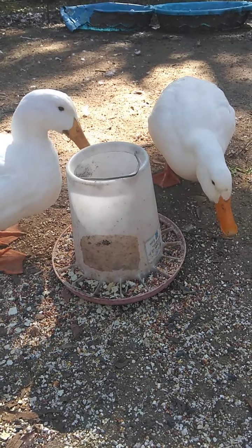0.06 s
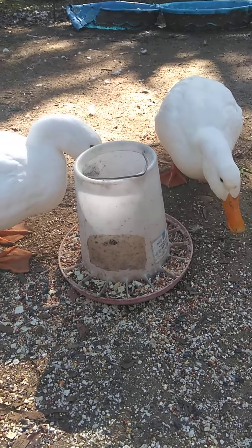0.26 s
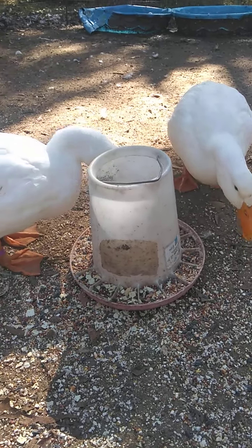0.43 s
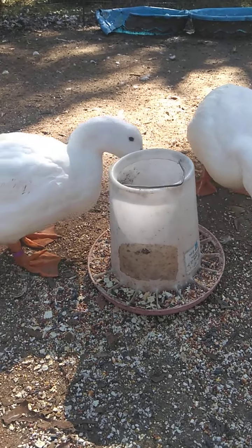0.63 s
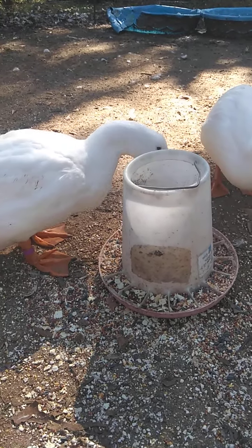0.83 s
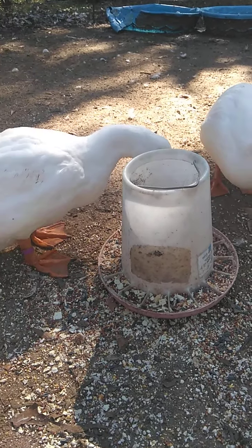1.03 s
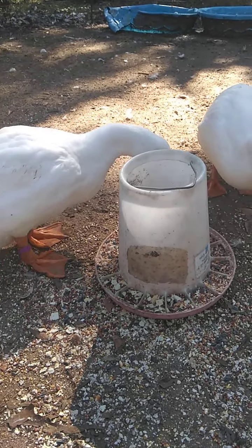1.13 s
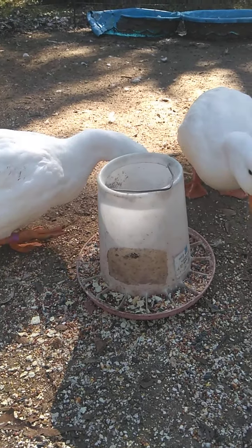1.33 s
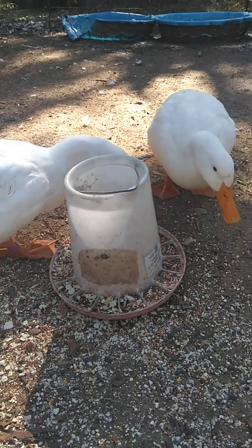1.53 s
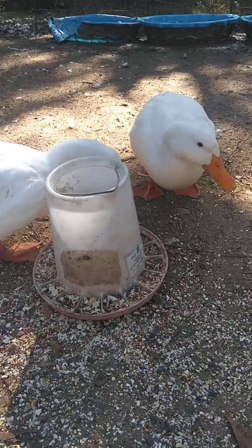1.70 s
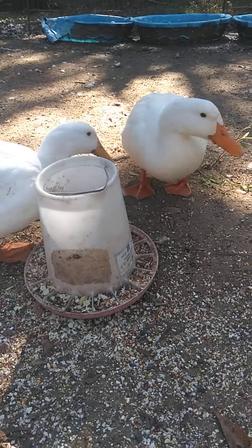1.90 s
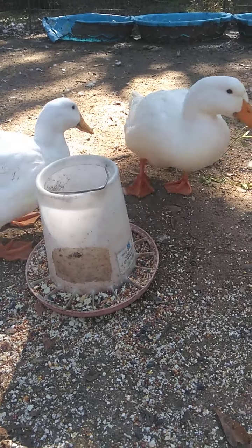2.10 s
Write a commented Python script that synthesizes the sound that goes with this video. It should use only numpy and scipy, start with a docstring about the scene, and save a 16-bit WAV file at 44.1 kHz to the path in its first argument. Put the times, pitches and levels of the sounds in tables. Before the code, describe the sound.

Duck quacking, close and dry outdoors. Three short, low, muffled clucks at about 0.1, 0.2 and 0.36 seconds lead to a loud, nasal, raspy quack at 0.5. A sharp bill tick comes at 0.83, a second quack at 0.9. Near quiet follows, then soft low pops from 1.6 and faint squeaks from 1.8 to 2.15. Very faint rumble, hiss, distant engine and insect lie beneath.

```python
"""A dirt yard with white ducks at a feeder: three low clucks run up to a loud quack, and a second quack follows.
Trains of pulses ring a resonant throat for the calls; single pulses make the soft pops and the bill ticks.
Gliding sines make thin squeaks, and filtered noise makes brief hiss. Decaying noise gives the yard's short answer.
One narrow tone rings faintly, an insect chirps, and a far engine drones over a low rumble."""
import sys
import numpy as np
from scipy import signal
from scipy.fft import rfft, irfft, next_fast_len
from scipy.io import wavfile
from scipy.ndimage import map_coordinates

SR = 44100
rng = np.random.default_rng(int(sys.argv[2]) if len(sys.argv) > 2 else 0)


def store_pcm(level_fs):
    """Save levels as 16-bit WAV."""
    pcm = np.round(np.clip(level_fs, -1, 1) * 32767).astype(np.int16)
    wavfile.write(sys.argv[1], SR, np.atleast_2d(pcm).T)


N = 94815
TIME = np.arange(N) / SR
SIZE = 2048  # samples in one ringing pulse
LEAD = 256  # samples in a pulse ahead of its tap
GRID = np.fft.rfftfreq(SIZE, 1 / SR)  # Hz
SQUEAK_ROUGH, SQUEAK_FLUTTER_HZ = 0.59, 358.3  # depth of the flutter, its random knots a second


def amp(db):
    """A level in decibels is 20 times the logarithm of the amplitude ratio."""
    return 10 ** (np.asarray(db) / 20)


def unit(x):
    """Dividing by the root mean square gives a signal unit rms."""
    return x / np.sqrt(np.mean(x ** 2) + 1e-20)


def along(points, hz):
    """Points of (Hz, value) are interpolated on a logarithmic frequency axis."""
    f, v = np.transpose(points)
    return np.interp(np.log(hz + 1), np.log(f + 1), v)


def wobble(rate):
    """Random modulation: a smooth curve through normal deviates, rate knots a second."""
    return map_coordinates(rng.standard_normal(4096), [TIME * rate], mode="wrap")


def filtered(x, response):
    """Linear filtering multiplies the spectrum by a response of frequency."""
    m = next_fast_len(N + SR // 2)
    spectrum = rfft(x, m) * response(np.fft.rfftfreq(m, 1 / SR))
    return irfft(spectrum, m)[..., :N]


def ringing(gain_db, early=0):
    """Impulse response: folding the cepstrum gives minimum phase; the share early builds up ahead of the tap."""
    cepstrum = irfft(np.log(np.maximum(amp(gain_db), 1e-6)))
    cepstrum[1:SIZE // 2] *= 2 * (1 - early)
    cepstrum[SIZE // 2 + 1:] *= 2 * early
    h = np.roll(irfft(np.exp(rfft(cepstrum))), LEAD)
    # equal energy whatever the colour: 0 dB is rms 1 over a quarter of a millisecond
    return h / np.linalg.norm(h) * np.sqrt(SR / 1000) / 2


def puff(decay_s):
    """Exponential decay: a noise burst of energy 1 falls to 1/e in decay_s."""
    burst = rng.standard_normal(SIZE // 2) * np.exp(-np.arange(SIZE // 2) / SR / decay_s)
    return burst / np.linalg.norm(burst)


def add(out, s, sound):
    """Superposition: a sound is added in place so that its tap falls at s seconds."""
    part = out[max(round(s * SR) - LEAD, 0):][:len(sound)]
    part += sound[:len(part)]


def noise(spectrum, alike):
    """Interaural correlation: mid and side noise are mixed to the correlation alike, at rms 1."""
    mid, side = filtered(rng.standard_normal((2, N)), lambda hz: amp(along(spectrum, hz)))
    side = side * np.tan(np.arccos(np.clip(alike, 0, 1)) / 2)
    return unit(np.array([mid + side, mid - side]))


def engine():
    """Harmonic source: a fundamental and weak second harmonic share one unsteady phase and level."""
    # Far engine. Each row: time in seconds, pitch in Hz, level in dB before the random swing.
    drone_curve = [(.68, 160.6, -80.5), (0.799, 169.4, -64.5), (1.099, 163.7, -64), (1.329, 152, -78),
                   (1.999, 145.5, -75)]
    s, hz, db = np.transpose(drone_curve)
    phase = 2 * np.pi * np.cumsum(np.interp(TIME, s, hz)) / SR + 0.45 * wobble(28)
    level = amp(np.interp(TIME, s, db) + 2.5 * wobble(20))
    return np.sqrt(2) * level * (np.sin(phase) + amp(-21.0) * np.sin(2 * phase))


def rumble():
    """Amplitude-modulated noise: a low band, nearly alike on both sides, swells at random."""
    # Colour of the rumble. Each row: frequency in Hz, relative level in dB.
    rumble_colour = [(35, -30.5), (61, 0.5), (75, -7), (200, -26.5), (350, -25.5), (600, -67.5)]
    mean_db, swell_db = -68.5, 4
    return amp(mean_db + swell_db * wobble(13)) * noise(rumble_colour, 0.93)


def faint_hiss():
    """Stationary noise: a broad faint band, nearly uncorrelated between the sides."""
    # Colour of the steady hiss. Each row: frequency in Hz, relative level in dB.
    air_colour = [(100, -1.5), (1300, -6.5), (2500, -9), (5800, -11), (12000, -20.5), (13200, -47)]
    return amp(-75.5) * noise(air_colour, 0.1)


def insect():
    """Amplitude modulation: half-waves of a slow, uneven sine gate one high note into chirps."""
    # A far insect: pitch in Hz, mean chirps a second, peak level in dB before the random swing.
    chirper = (5780, 10.5, -87)
    pitch_hz, rate, db = chirper
    chirps = np.maximum(np.sin(2 * np.pi * rate * TIME + wobble(rate)), 0)
    note = np.sin(2 * np.pi * pitch_hz * TIME + wobble(SQUEAK_FLUTTER_HZ) / 2)
    return amp(db + 2 * wobble(rate)) * chirps * note


def ring():
    """Narrow-band tone: a sine of fixed frequency swells and fades around the calls."""
    # Level of the thin tone. Each row: time in seconds, level in dB.
    swell = [(.05, -88), (0.199, -68.5), (0.721, -106.5), (.85, -71.5), (1.101, -74.5), (1.22, -99),
             (1.78, -86), (1.852, -69), (2.1, -80)]
    pitch_hz = 1240
    s, db = np.transpose(swell)
    return np.sqrt(2) * amp(np.interp(TIME, s, db)) * np.sin(2 * np.pi * pitch_hz * TIME)


def yard(x):
    """Reverberation: convolution with decaying noise gives quick scatter from ground and feeder, then a diffuse tail."""
    # Decay of the tail. Each row: frequency in Hz, time to fall 60 dB in seconds.
    tail_t60 = [(150, 0.17), (6000, 0.29)]
    # Colour of the tail. Each row: frequency in Hz, gain in dB.
    tail_colour = [(200, -18.5), (700, -12), (1300, -18.5), (2400, -5), (3600, -23.5), (10000, 6)]
    ground_db, ground_t60 = -13, 0.11  # gain of the scatter, seconds to fall 60 dB
    hz, t, z = signal.stft(rng.standard_normal((2, SR // 2)), SR, nperseg=256)
    decay = amp(-60 * t / along(tail_t60, hz)[:, None])
    tail = signal.istft(z * decay, SR, nperseg=256)[1]
    late = signal.fftconvolve(x[None], tail / np.linalg.norm(tail[0]), axes=1)[:, :N]
    scatter = rng.standard_normal((2, N)) * amp(-60 * TIME / ground_t60)
    early = signal.fftconvolve(x[None], scatter / np.linalg.norm(scatter[0]), axes=1)[:, :N]
    return amp(ground_db) * early + filtered(late, lambda hz: amp(along(tail_colour, hz)))


def ticks():
    """Impact excitation: each dry click of a bill on grain is one band-limited snap and a little grit."""
    # Each row: time in seconds, level of the snap in dB, centre in Hz, half width in octaves.
    tick_rows = [(0.063, -46.5, 3290, 0.11), (0.8311, -29.5, 3710, 1.3), (1.908, -54.5, 3440, 0.2),
                 (2.106, -42, 1148, 0.25)]
    # Colour common to all ticks. Each row: frequency in Hz, relative level in dB.
    tick_colour = [(1200, -13), (1700, -6), (3000, -7.5), (6100, -8), (13000, -44.5)]
    grit, grit_decay_s = 0.26, 0.0083
    out = np.zeros(N)
    for s, db, hz, width in tick_rows:
        band = -10 * np.log10(1 + (np.log2((GRID + 1) / hz) / width) ** 4)
        snap = amp(db) * ringing(along(tick_colour, GRID) + band)
        add(out, s, snap)
        add(out, s, grit * np.convolve(snap, puff(grit_decay_s)))
    return out


def pops():
    """Impulse response of a resonator: each soft pop is a single low pulse of the throat."""
    # Each row: time in seconds, level in dB.
    pop_rows = [(0.428, -40.5), (0.828, -37.5), (1.575, -43), (1.783, -35), (1.976, -35.5), (2.106, -42.5)]
    # Colour of the throat in a pop. Each row: frequency in Hz, relative level in dB.
    pop_colour = [(150, -27.5), (290, 13), (380, -1.5), (520, 5.5), (720, -20.5), (1200, -23.5),
                  (3000, -55.5)]
    out = np.zeros(N)
    for s, db in pop_rows:
        add(out, s, amp(db) * ringing(along(pop_colour, GRID)))
    return out


def hiss():
    """Band-passed noise: short Gaussian swells of airy hiss, roughened by a random flutter."""
    # A thin puff before the first quack, then a rasp on a squeak. Each row: peak in seconds,
    # half length (to 1/e) in seconds, peak level in dB before flutter, lower and upper limit in Hz.
    puff_rows = [(0.457, 0.044, -82, 9090, 12000), (1.824, 0.019, -61.5, 1750, 5450)]
    out = np.zeros(N)
    for s, half, db, low_hz, high_hz in puff_rows:
        air = filtered(rng.standard_normal(N), lambda hz: (hz > low_hz) / (1 + (hz / high_hz) ** 10))
        out += amp(db) * unit(air) * np.exp(-((TIME - s) / half) ** 2)
    return out * (1 + SQUEAK_ROUGH * wobble(SQUEAK_FLUTTER_HZ))


def squeaks():
    """Frequency modulation: a sine follows each pitch glide, its amplitude fluttering at random."""
    # One curve for each squeak. Each row: time in seconds, pitch in Hz, level in dB before flutter.
    squeak_curves = [
        [(.411, 6130, -85), (.424, 7544, -69), (.44, 8150, -80)],
        [(1.790, 1344, -78.5), (1.815, 2090, -57), (1.840, 1054, -55.5), (1.856, 866, -61)],
        [(1.826, 947, -88), (1.838, 508.4, -47), (1.858, 454, -84)],
        [(2.005, 2080, -86), (2.017, 1523, -59.5), (2.056, 730, -68)],
        [(2.020, 888, -63), (2.027, 827, -55), (2.047, 480, -54.5), (2.057, 430, -88)],
        [(2.112, 1392, -75), (2.134, 1456, -58), (2.152, 1490, -71)],
        [(2.120, 812, -80), (2.152, 850, -64.5)],
    ]
    out = np.zeros(N)
    for curve in squeak_curves:
        s, hz, db = np.transpose(curve)
        tone = np.sin(2 * np.pi * np.cumsum(np.interp(TIME, s, hz)) / SR)
        level = np.interp(TIME, s, amp(db), left=0, right=0)
        out += np.sqrt(2) * level * tone * (1 + SQUEAK_ROUGH * wobble(SQUEAK_FLUTTER_HZ))
    return out


def call(curve, throat_db, voice):
    """Source and filter: syrinx pulses ring the throat, their treble a rasp of air; low resonances sink."""
    dull_below_db, dulling, sink, main_hz, rasp = voice
    rasp_from_hz, rasp_decay_s = 1400, .0022
    flutter_db, flutter_hz = 2, 450  # the treble colour varies from pulse to pulse; spacing of its knots
    build_up = .25  # share of the ringing that builds up ahead of the tap
    jitter_s, shimmer_db = .00009, .7  # random spread of pulse time and of pulse level
    s, hz, db = np.transpose(curve)
    out, t = np.zeros(N), s[0]
    octaves = abs(np.log2(np.maximum(GRID, GRID[1]) / main_hz))
    upper = GRID ** 4 / (GRID ** 4 + rasp_from_hz ** 4)
    airy = np.clip(rasp, 0, 1) * upper
    while t <= s[-1]:
        jitter, shimmer = rng.standard_normal(2)
        level_db = np.interp(t, s, db)
        progress = (t - s[0]) / (s[-1] - s[0])
        stretch = 1 + sink * (.5 - progress) * (1 - upper)
        knots = rng.standard_normal(128)
        flutter = flutter_db * upper * map_coordinates(knots, [GRID / flutter_hz], mode="wrap")
        colour = np.interp(GRID / stretch, GRID, throat_db) + flutter
        # a weak pulse rings mostly the main resonance
        colour = colour - dulling * max(dull_below_db - level_db, 0) * octaves
        air = rfft(puff(rasp_decay_s), SIZE)
        pulse = rfft(-ringing(colour, build_up))
        pulse = irfft(pulse * (np.sqrt(1 - airy) + np.sqrt(airy) * air))
        add(out, t + jitter_s * jitter, amp(level_db + shimmer_db * shimmer) * pulse)
        t += 1 / np.interp(t, s, hz)
    return out


def clucks():
    """Low-pass radiation: a nearly shut bill muffles calls whose pulses quicken, then slow as they fade."""
    # One curve for each cluck. Each row: time in seconds, pitch in Hz, level in dB before shimmer.
    cluck_curves = [
        [(.0941, 133, -40), (.1074, 177.7, -31), (.1235, 209, -30.5), (.130, 244.4, -38), (.152, 176, -50)],
        [(.2085, 144.7, -33), (.2235, 144.6, -17.5), (.2419, 187.6, -26), (.248, 253, -36), (.279, 154.4, -37)],
        [(.3573, 136.4, -31), (.3787, 148.7, -22.5), (.3969, 200.5, -28.5), (.414, 174, -49.5)],
    ]
    # Throat with the bill nearly shut. Each row: frequency in Hz, relative level in dB.
    shut_throat = [(60, -16.5), (155, 5), (570, 1), (800, -10), (1020, 0.5), (1300, -23.5), (1750, -9.5),
                   (2700, -21.5), (3800, -20.5), (5000, -46.5), (6500, -37.5), (9000, -56.5)]
    # Level in dB below which a pulse dulls, dulling in dB per octave for each dB, share by which
    # the low resonances sink, main resonance in Hz, rasp (limited to 0-1 in use).
    cluck_voice = (-29, 1, 0.93, 549.5, 1.5)
    return sum(call(curve, along(shut_throat, GRID), cluck_voice) for curve in cluck_curves)


def lead_in(s):
    """Frequency glide: a falling whistle swells to a peak at s seconds, where the pulses take over."""
    # Length of the fall in seconds, first and last pitch in Hz, peak level in dB.
    whistle = (.012, 1500, 1250, -39)
    length, first_hz, last_hz, db = whistle
    hz = np.interp(TIME, [s - length, s], [first_hz, last_hz])
    swell = np.exp(-(2 * (TIME - s) / length) ** 2)
    return amp(db) * swell * np.sin(2 * np.pi * np.cumsum(hz) / SR)


def quacks():
    """Formants: open-billed calls sag in pitch, each with its own bright upper resonances."""
    # One curve for each quack. Each row: time in seconds, pitch in Hz, level in dB before shimmer.
    quack_curves = [
        [(.4846, 255.8, -22.5), (.4925, 210.4, -16), (.5116, 209.8, -11), (.5266, 191.9, -15.5),
         (.538, 173.6, -18), (.546, 240, -41)],
        [(.8917, 213.6, -28), (.9058, 211.6, -14.5), (.921, 190.7, -13), (.9316, 188.5, -13),
         (.946, 222.8, -28), (.972, 174.2, -56.5)],
    ]
    # Throat with the bill open. Each row: frequency in Hz, relative level in dB.
    open_throat = [(90, -28.5), (200, -3.5), (420, -9.5), (660, -18.5), (900, -11.5), (1250, 3),
                   (1650, -10), (2100, -26), (2850, -29), (3700, -22), (5200, -27), (5800, -22.5),
                   (8500, -51.5), (14000, -67.5)]
    # Upper resonances of the bill, one list a quack. Each row: centre in Hz, lift in dB, width in octaves.
    bill_resonances = [
        [(4590, 14.5, 0.089)],
        [(3430, 13.5, 0.29), (4500, 3.5, .08)],
    ]
    # Level in dB below which a pulse dulls, dulling in dB per octave for each dB, share by which
    # the low resonances sink, main resonance in Hz, rasp from 0 to 1.
    quack_voice = (-21, 0.7, 0.29, 1280.5, 0.65)
    out = np.zeros(N)
    for curve, bill in zip(quack_curves, bill_resonances):
        lift = sum(db * np.exp(-(np.log2((GRID + 1) / hz) / width) ** 2) for hz, db, width in bill)
        out += call(curve, along(open_throat, GRID) + lift, quack_voice)
        out += lead_in(curve[0][0])
    return out


def scene():
    """Stereo localisation: level and phase differences set the close ducks a little to the right."""
    # Left over right. Each row: frequency in Hz, level difference in dB.
    balance = [(200, -1), (1300, -2.8), (2500, -2), (4200, 5.5), (6000, -1)]
    # Lag of the left side. Each row: frequency in Hz, phase in radians.
    left_lag = [(200, .2), (1500, .55), (4200, 1.9), (6000, 1.1)]
    ducks = quacks() + clucks() + squeaks() + hiss() + pops() + ticks()
    sides = np.array([[.5], [-.5]])  # each side takes half of the difference
    direct = filtered(ducks, lambda hz: amp(sides * along(balance, hz)) * np.exp(-1j * sides * along(left_lag, hz)))
    background = engine() + rumble() + faint_hiss()
    return direct + yard(ducks) + ring() + insect() + background


def record(dry):
    """Band limitation: the top treble is dull, and nothing is kept from the band limit up."""
    # Top treble roll-off. Each row: frequency in Hz, gain in dB.
    top_rolloff = [(12000, 1.5), (14000, -26)]
    top_hz = 15600
    return filtered(dry, lambda hz: amp(along(top_rolloff, hz)) * (hz < top_hz))


dry = scene()
out = record(dry)
store_pcm(out)
```